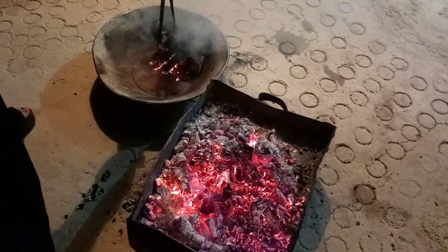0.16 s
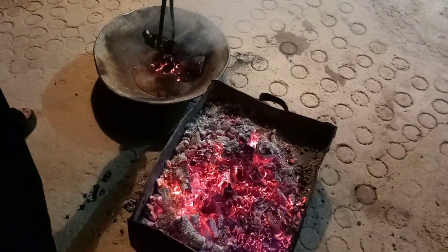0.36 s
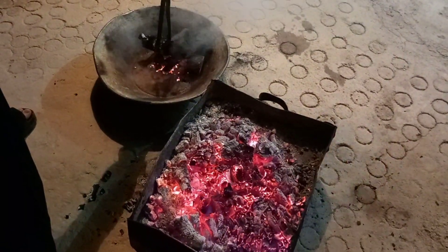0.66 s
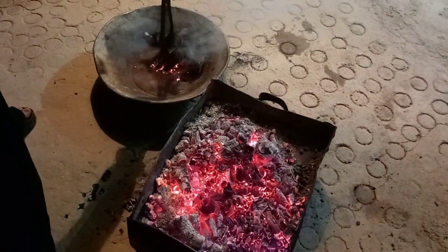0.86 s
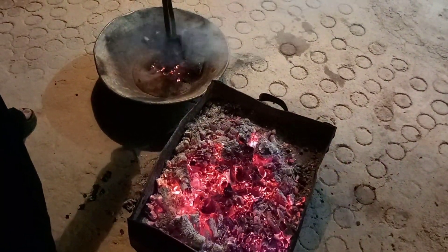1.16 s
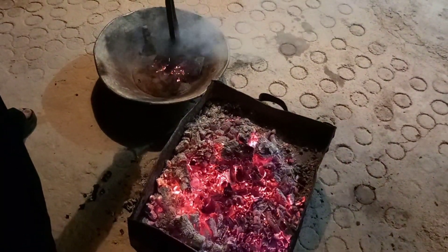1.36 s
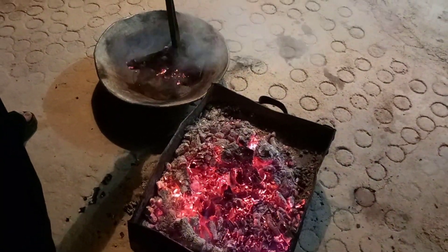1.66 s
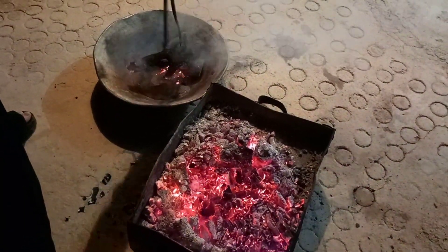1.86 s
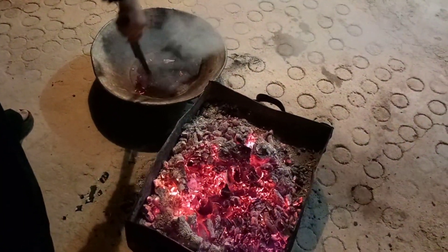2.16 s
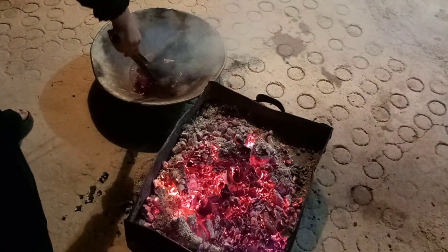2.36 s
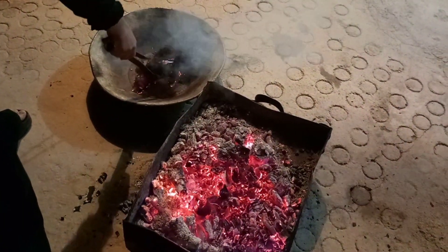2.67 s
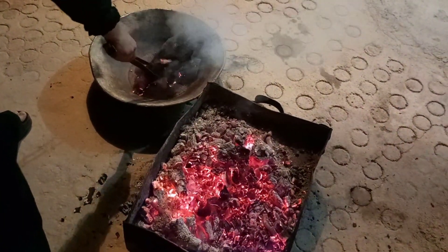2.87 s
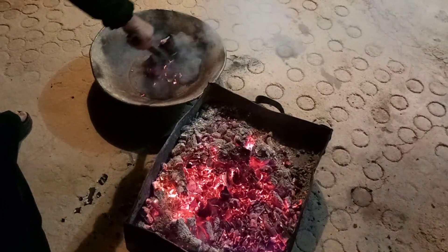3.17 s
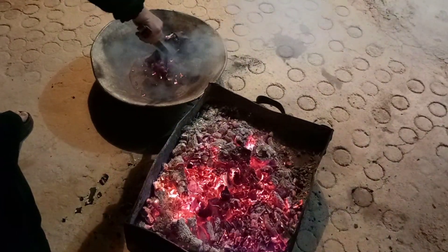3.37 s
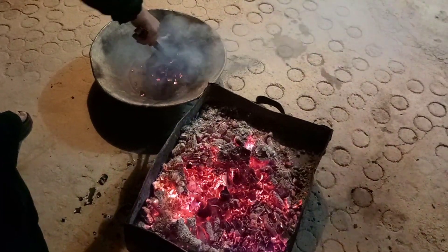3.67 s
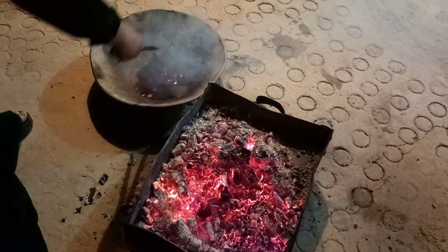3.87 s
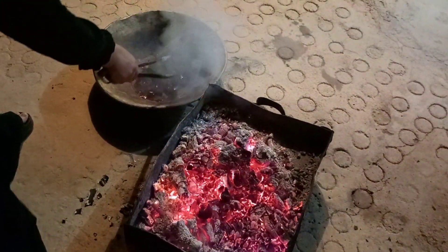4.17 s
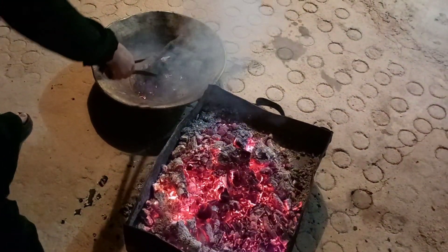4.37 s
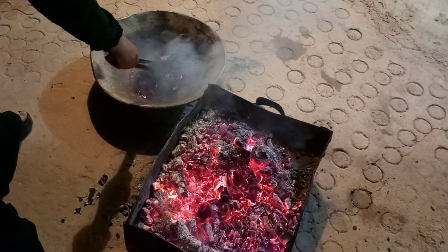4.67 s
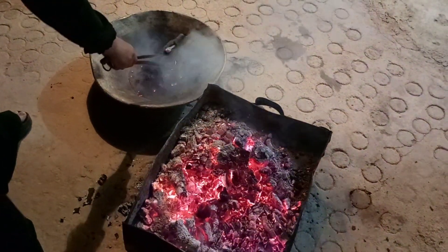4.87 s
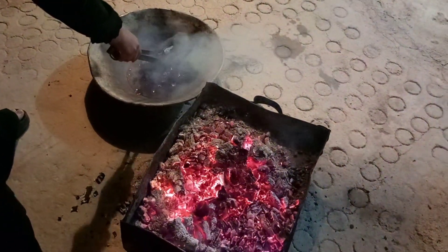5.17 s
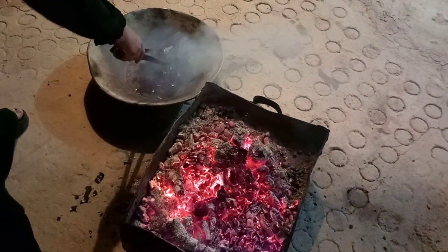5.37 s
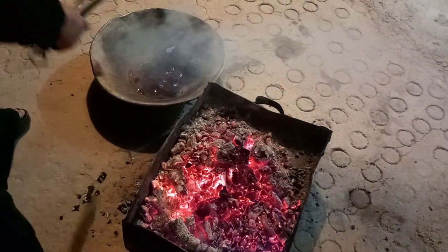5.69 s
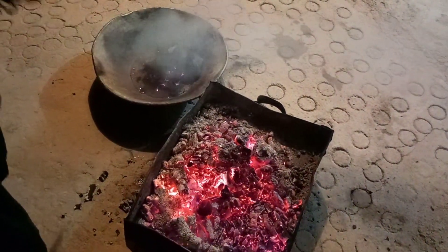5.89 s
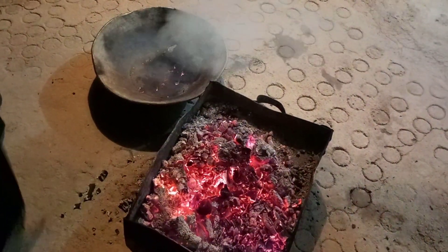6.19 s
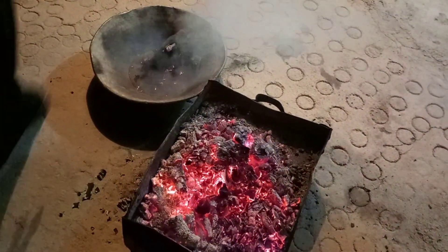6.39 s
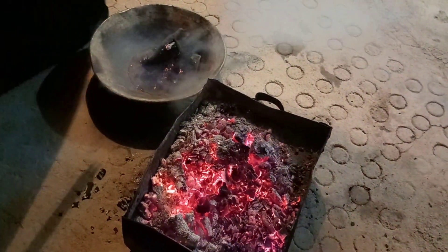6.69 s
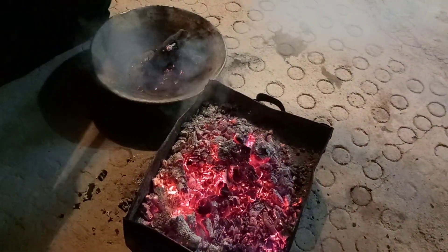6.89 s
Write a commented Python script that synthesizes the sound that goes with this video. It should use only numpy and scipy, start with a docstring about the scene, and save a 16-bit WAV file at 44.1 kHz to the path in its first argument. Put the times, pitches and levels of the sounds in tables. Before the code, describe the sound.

A close, fairly dry stereo pickup outdoors on a concrete yard, with very faint background air. From 0 to 1 s, hot charcoal sizzles finely and snaps in high dry ticks while tongs nudge it softly. From about 1.16 s the pushes become firmer: gritty scrapes, hollow low thuds and brittle cracks in a resonant metal wok, with strong crunches near 2.1 and 2.55 s and short bowl hums. Lighter stirring follows, then the loudest cluster of knocks and grinding at 3.84-4.0 s. It quiets to sparse tong ticks until further thuds at 4.8-5.13 s. After 5.3 s shoes tread softly; tongs clack brightly around 5.73-5.86 s and jingle at 6.07-6.4 s, with a tiny, piercing squeak at 6.33 s. Shoe knocks and a sandy scuff come around 6.5-6.6 s, then faint steps and ember snaps until 7 s.

```python
"""Coals grind, crackle and snap as steel tongs push smouldering charcoal about in a wok on a concrete yard.
Noise of micro-contacts, shaped by each push, excites the modes of the bowl; lumps thud, crack and leave it humming.
Touching tongs clink through their own modes; splitting embers give brief high tones with noise.
Near the end shoes tread, knock and scuff, while the tongs jingle and squeak in two wavering tones.
A weak diffuse reverberation and faint outdoor noise surround the scene."""
import sys
import numpy as np
from scipy import signal
from scipy.fft import rfft, irfft
from scipy.io import wavfile
from scipy.ndimage import uniform_filter1d

SR = 44100
rng = np.random.default_rng(int(sys.argv[2]) if len(sys.argv) > 2 else 0)


def store_wav(level_fs):
    """Save 16-bit WAV to argv[1]."""
    pcm = np.round(np.clip(np.atleast_2d(level_fs), -1, 1) * 32767)
    wavfile.write(sys.argv[1], SR, pcm.T.astype(np.int16))


N = 310464
TIME = np.arange(N) / SR   # t/s

# Event levels are relative: they apply before the sources are mixed. Decay times are to 1/e.
# Spectra: columns f/Hz, relative density level/dB.

# outdoor background
AIR_SPECTRUM = [(25, -31.5), (50, -11.5), (100, 2.5), (160, -7.5), (250, -15), (450, -15), (750, -15.5),
                (1100, -18.5), (2000, -31.5), (4000, -28), (8000, -28.5), (9500, -43), (16000, -37)]
AIR_DB = -66.5
# hot coals: level over time, columns t/s, level/dB; then spectrum
SIZZLE_LEVEL = [(0, -63.5), (.9, -61), (1.3, -70), (2.3, -78), (2.8, -61), (3.3, -63), (3.6, -72),
                (4.4, -85), (7.04, -88)]
SIZZLE_SPECTRUM = [(2000, -23), (4000, -6.5), (5500, 2.5), (8000, -0.5), (11000, -7.5), (16000, -4)]

# pushes into the coals: columns start t/s, rise t/s, hold t/s, rumble level/dB, scrape level/dB, grit level/dB
COAL_PUSHES = [ (0.0, 0.0029, .05, -59.5, -65, -61.5), (0.066, 0.0072, 0.011, -57, -53.5, -54),
               (0.216, .012, .08, -53.5, -57, -55.5), (0.305, .03, 0.2, -51, -48.5, -50),
               (0.45, 0.031, 0.053, -43, -42.5, -42), (0.555, 0.011, 0.17, -47, -49, -48.5),
               (0.709, 0.015, 0.099, -46.5, -48.5, -49), (0.891, 0.0054, 0.059, -58, -55, -53.5),
               (1.163, .002, 0.056, -35.5, -40, -41), (1.274, 0.0062, .015, -49, -41, -45),
               (1.416, .003, 0.029, -42, -37, -41), (1.526, 0.0058, 0.047, -41.5, -48, -45.5),
               (1.564, 0.024, 0.014, -41.5, -35, -36.5), (1.676, 0.01, 0.03, -38.5, -48.5, -60),
               (1.771, 0.016, 0.068, -52, -63.5, -61), (1.87, 0.018, 0.097, -55, -56, -54),
               (1.98, 0.087, 0.028, -52.5, -46, -48), (2.091, 0.0061, 0.027, -32, -27.5, -28),
               (2.343, 0.0045, 0.045, -39.5, -44.5, -43), (2.376, 0.014, 0.034, -50, -38.5, -40.5),
               (2.497, .025, .02, -44.5, -44, -46), (2.541, 0.0066, 0.013, -32, -35.5, -42),
               (2.604, 0.0062, 0.024, -43, -60, -50.5), (2.69, 0.022, .07, -53.5, -60, -55.5),
               (2.834, 0.019, 0.053, -51.5, -56, -54), (2.954, 0.0074, 0.042, -40.5, -48.5, -53),
               (3.06, 0.065, 0.079, -51.5, -55.5, -59.5), (3.221, 0.026, 0.11, -64, -55, -57.5),
               (3.363, 0.014, 0.011, -46, -47, -47), (3.411, .008, 0.032, -55, -48.5, -50.5),
               (3.665, 0.013, 0.032, -42, -56, -57.5), (3.7, .008, .1, -52.5, -48, -49.5),
               (3.843, 0.0028, 0.015, -31.5, -24.5, -26), (3.89, 0.0021, 0.053, -28.5, -25.5, -28),
               (3.976, 0.0048, 0.06, -32, -35, -38), (4.219, 0.0071, 0.037, -56, -58, -54),
               (4.58, .005, 0.12, -63.5, -65.5, -65), (4.697, 0.034, 0.063, -52, -63, -63.5),
               (4.787, 0.029, 0.065, -40, -50.5, -54), (4.897, 0.015, 0.17, -50, -54, -50),
               (5.019, 0.0089, 0.02, -33, -41, -42), (5.133, 0.014, 0.026, -44, -54.5, -54)]
PUSH_SAG_DB_PER_S = 33.5   # the heap gives way while the push lasts
SETTLE_DB_PER_S = (177.5, 178, 198)   # then the coals settle: (rumble, scrape, grit)
# lumps knocking on the bowl: columns t/s, thud level/dB, thud f/Hz, crack level/dB, decay t/s
LUMP_KNOCKS = [(0.721, -32.5, 230, -38, 0.017), (1.166, -31.5, 340, -35, 0.019),
               (1.209, -21.5, 239, -51, 0.0028), (1.842, -39, 424, -41.5, 0.0094),
               (2.104, -24.5, 243, -20, 0.024), (2.139, -28, 343, -42.5, 0.017),
               (2.543, -27.5, 280, -29, 0.03), (2.966, -37, 181, -60, 0.031), (3.313, -42, 297, -48, 0.03),
               (3.699, -38, 153, -41, 0.019), (3.848, -22, 397, -18.5, 0.0079),
               (3.892, -15.5, 267, -19, 0.0081), (3.910, -19, 800, -28, .005),
               (3.930, -16, 263, -23.5, 0.0075), (3.99, -23, 334, -49, 0.0067),
               (4.029, -30, 138, -55, 0.015), (4.14, -38.5, 290, -45, 0.012),
               (4.818, -32.5, 131, -43.5, 0.034), (5.029, -23, 354, -42, 0.0094),
               (5.126, -49, 634, -41, 0.0037)]
# modes of the bowl: columns f/Hz, gain/dB, decay by 60 dB t/s
WOK_MODES = [(125, 11.5, 0.33), (250, -7.5, 0.18), (313.6, 4.5, 0.071), (338.4, 5, 0.43), (392, -15.5, 0.8),
             (420, -20, 1), (573.7, 17.5, 0.34), (611, 8.5, 0.33), (780, -23, 0.74), (798, 17.5, 0.54),
             (834, 14, 0.38), (875.4, 16, 0.43), (1254, 20.5, 0.19), (1299, 17, 0.25), (1366, 12, 0.32),
             (1370, 10, 0.22), (1467, 16.5, 0.087), (1840, -1, .5), (1960, 2, .5), (2560, -10, 0.21),
             (2330, 13, 0.11), (2890, -3.5, .4), (3000, -8, 0.46), (3120, 0, 0.28), (3080, -7.5, .5),
             (3250, 2.5, 0.3), (3950, -14.5, .25), (4090, -13.5, 0.2), (5060, 14, 0.083)]
# spectra of the low, middle and high parts of the grinding, and of the cracks
RUMBLE_SPECTRUM = [(30, -37), (55, -26), (90, -7.5), (140, -6), (220, 0.5), (320, 5), (480, 2), (680, -7.5),
                   (900, -9.5), (1500, -33)]
SCRAPE_SPECTRUM = [(400, -37), (650, 1.5), (820, -1.5), (980, -2.5), (1250, -2), (1550, -1), (1900, -4.5),
                   (2450, -3.5), (2900, -17.5), (4500, -32.5)]
GRIT_SPECTRUM = [(1700, -35), (2400, -4), (2900, 3.5), (4000, 0), (4900, -7), (6200, -5.5), (8000, -17.5),
                 (10000, -22), (13000, -23), (16000, -26.5)]
CRACK_SPECTRUM = [(400, -10.5), (800, 7.5), (1000, -27), (1350, 4.5), (2000, -4), (3200, -2.5), (5500, 2),
                  (9000, -6), (16000, -20)]
LEAN_HZ, LEAN_T60_S, LEAN_SHARE = 1500, 0.0013, .2   # the bowl throws its middle range to the left
# splintering coal
SPLINTER_SPECTRUM = [(3000, -23), (5500, -0.5), (8000, -1), (10500, -5), (13000, -3.5), (16000, -10)]
# level relative to the grit; release after the push; sag during the push
SPLINTERS_DB, SPLINTERS_RELEASE_DB_PER_S, SPLINTERS_SAG_DB_PER_S = -7.5, 300.5, 79.5

# charcoal splitting: columns t/s, level/dB, f/Hz
EMBER_SNAPS = [(.007, -36, 14100), (0.1678, -25, 15200), (0.282, -28, 13900), (0.3764, -16, 14400),
               (.726, -30, 13100), (.764, -32, 14800), (1.018, -43, 11100), (1.055, -44, 12000),
               (1.799, -39, 4270), (3.070, -38, 9700), (3.171, -39, 7200), (4.939, -28, 14500),
               (5.955, -42, 4560), (6.511, -35, 8400), (6.839, -39, 13300), (6.887, -30, 7140),
               (6.888, -38, 3180)]
FAINT_SNAPS_DB, FAINT_SNAPS_HZ = -58, (3000, 13000)   # lowest level and range of random ticks

# one mode of the bowl humming: columns t/s, level/dB, f/Hz, decay t/s
BOWL_HUMS = [(1.29, -45, 893, 0.054), (2.11, -31.5, 347.6, 0.061), (2.551, -28.5, 347, 0.059),
             (2.971, -37.5, 349, 0.069), (3.70, -41, 348, 0.036), (3.85, -28.5, 858, 0.064),
             (3.892, -23.5, 804, 0.05), (3.895, -31.5, 1340, 0.059), (4.82, -39.5, 347, 0.069)]
# hollow blips of falling pitch: columns t/s, peak level/dB
HOLLOW_BLIPS = [(1.705, -30.5), (1.843, -35.5), (1.943, -42), (2.465, -34.5), (5.029, -23), (5.1255, -25)]

# arms touching: columns t/s, level/dB, sliding t/s, treble level re the rest/dB, favoured f/Hz
TONG_CLINKS = [(1.876, -40.5, 0.0095, 7, 14100), (1.908, -37.5, 0.0038, 8, 8500),
               (2.696, -49, 0.04, 8.5, 7450), (2.827, -40, 0.0072, -2, 5030),
               (2.875, -47, 0.023, -22, 4920), (3.89, -37.5, 0.012, 19.5, 15300),
               (4.225, -55, 0.013, -11, 5400), (4.263, -40.5, 0.0059, 7.5, 8300),
               (4.444, -60, 0.013, -3.5, 8060), (4.584, -57.5, 0.022, 8, 5700),
               (4.641, -58, 0.011, 7, 6400), (4.687, -47, 0.018, -2, 3330),
               (4.718, -53.5, 0.0046, 12, 7300), (4.999, -34.5, 0.013, 7.5, 8800),
               (5.462, -52, 0.0067, -22, 5530), (5.532, -63.5, 0.056, -22, 7300),
               (5.620, -51.5, 0.18, -9, 6270), (5.66, -42, 0.057, 16.5, 8500),
               (5.716, -46, 0.058, -4, 7500), (5.731, -40, 0.014, 22, 5600), (5.761, -33, 0.0037, -4, 6960),
               (5.785, -25.5, 0.0032, 12, 4620), (5.841, -20, 0.001, 0, 8150),
               (5.858, -35, 0.0031, -5, 7900), (5.915, -44.5, 0.0062, 6.5, 7750),
               (6.066, -45.5, 0.021, 4.5, 3080), (6.141, -49, 0.0091, -2, 7270),
               (6.228, -35.5, 0.017, 3.5, 6700), (6.33, -45, 0.036, 16, 7200), (6.34, -35, 0.028, 10, 6700),
               (6.35, -47, 0.054, -10, 3720), (6.395, -36, 0.011, 5, 6230), (6.406, -34, 0.0043, 1, 6290)]
# modes of the tongs: columns f/Hz, gain/dB, decay by 60 dB t/s
TONG_MODES = [(3014, 9, 0.16), (3710, 8, 0.086), (4040, 0.5, 0.19), (4500, 6, 0.14), (5400, 10.5, 0.062),
              (5610, -1, 0.17), (6304, 8, 0.033), (6600, -3.5, .12), (6970, 3, 0.047), (7300, -24, 0.16),
              (7660, 2.5, 0.14), (8270, 5, 0.056), (8130, -12, 0.073), (9240, 9.5, 0.047),
              (8980, -4.5, 0.034), (10100, 6, 0.11), (11130, 1.5, 0.16), (11420, 3, 0.064),
              (12100, 8.5, 0.14), (12750, 7, .08), (14070, 12.5, 0.13), (14800, -1, .06),
              (15370, -10, 0.092)]
# steel touching steel
TICK_SPECTRUM = [(700, -25), (2000, -6.5), (3500, -7), (5500, 1), (8100, 3), (9700, -7.5), (12000, -7.5),
                 (15500, -13)]
# taps that leave one arm singing: columns t/s, level/dB, f/Hz, decay t/s
TONG_PINGS = [(5.732, -40, 5200, 0.022), (5.786, -46, 4505, 0.062), (6.069, -39.5, 3025, 0.0073),
              (6.230, -48, 6815, 0.013), (2.877, -50, 4900, .02)]

# feet on concrete: columns start t/s, rise t/s, hold t/s, tread level/dB, shuffle level/dB
FOOT_TREADS = [(5.3, .03, 0.21, -62, -72.5), (5.525, 0.035, .14, -48, -60.5), (5.72, .02, 0.16, -61, -59),
               (5.88, 0.0037, 0.1, -55, -61), (6.03, 0.025, 0.061, -56, -68),
               (6.14, 0.022, 0.48, -54.5, -59.5), (6.508, .004, 0.09, -43.5, -58.5),
               (6.6, 0.031, 0.023, -54, -50.5), (6.73, .01, 0.034, -51.5, -61.5),
               (6.884, .004, 0.011, -64, -54), (6.97, .02, .06, -64, -80)]
TREAD_SAG_DB_PER_S, TREAD_RELEASE_DB_PER_S = 13, (143, 151)   # release: (tread, shuffle)
# sand under a dragging sole: columns start t/s, rise t/s, hold t/s, level/dB
SAND_SCUFFS = [(6.51, 0.0021, 0.0042, -56.5), (6.56, 0.06, 0.014, -48), (6.884, 0.0019, 0.0034, -60)]
SCUFF_RELEASE_DB_PER_S = 234
# spectra of tread, shuffle and sand
TREAD_SPECTRUM = [(25, -22), (45, -16), (70, -3), (135, 0), (210, -6), (400, -25.5), (900, -52)]
SHUFFLE_SPECTRUM = [(120, -15.5), (240, -14.5), (450, -16.5), (800, -14.5), (1200, -20.5), (2500, -24.5),
                    (6000, -38.5)]
SAND_SPECTRUM = [(600, -31), (1200, -2.5), (2400, 4.5), (4000, 3), (6000, -1), (8000, 4.5), (10000, -7),
                 (16000, -9)]
# heel and toe knocks: columns t/s, level/dB, decay t/s; then spectrum
HEEL_KNOCKS = [(5.882, -45.5, 0.029), (6.512, -49, 0.012), (6.562, -44.5, 0.037)]
HEEL_SPECTRUM = [(100, -19), (300, 2), (480, 7.0), (800, -6), (1300, -28), (4000, -20)]

# binding arms: columns start t/s, rise t/s, hold t/s, lower tone level/dB, upper tone level/dB
ARM_SQUEAKS = [(6.328, 0.016, .012, -28.5, -29.5)]
SQUEAK_HZ, SQUEAK_RELEASE_DB_PER_S = (14231, 15367), (356, 496)   # (lower tone, upper tone)

MIC_LOW_CUT_HZ, CUTOFF_HZ = 35, 15900


def from_db(db):
    """Level to amplitude: 20 dB for each factor of ten."""
    return 10 ** (np.asarray(db) / 20)


def rms_one(x):
    """Normalisation to unit rms."""
    return x / np.sqrt(np.mean(x ** 2) + 1e-20)


def even(x, size=1300):
    """Short-time normalisation: unit rms over a window of this many samples (some 30 ms by default)."""
    return x / np.sqrt(np.abs(uniform_filter1d(x ** 2, size=size)) + 1e-12)


def convolve(x, response):
    """Linear superposition: causal convolution of mono or stereo sound with a response."""
    return signal.oaconvolve(np.atleast_2d(x), np.atleast_2d(response), axes=-1)[:, :N]


def colour(x, spectrum, size=4096):
    """Minimum-phase filtering by a folded cepstrum; white noise keeps its power."""
    hz, db = np.transpose(spectrum)
    log_hz = np.log(np.fft.rfftfreq(size, 1 / SR) + 1)
    gain = rms_one(from_db(np.interp(log_hz, np.log(hz), db)))
    cepstrum = irfft(np.log(gain))[:size // 2]
    cepstrum[1:] *= 2
    return convolve(x, irfft(np.exp(rfft(cepstrum, size))))[0]


def grains(per_s, spread_db):
    """Granular contact as random impulses of uneven size and sign, evened to unit rms."""
    sizes = from_db(spread_db * np.minimum(rng.exponential(1, N), 4))
    impulses = sizes * rng.choice([-1, 1], N)
    return even(impulses * (rng.random(N) < per_s / SR))


def bursts(times, levels_db, lengths):
    """Impulsive contact: sudden onsets with exponential decay."""
    out = np.zeros(N)
    for s, db, length in zip(times, levels_db, lengths):
        part = out[int(s * SR):][:SR // 2]
        part += from_db(db) * np.exp(-TIME[:len(part)] / length)
    return out


def gestures(rows, release_db_per_s, sag_db_per_s=0):
    """Superposed powers: per level column, each gesture rises, sags while held, then decays exponentially."""
    power = np.zeros((len(release_db_per_s), N))
    for start, rise, hold, *levels_db in rows:
        first = int(start * SR)
        t = TIME[:min(SR, N - first)]
        attack = np.minimum(t / rise, 1)
        held, released = np.clip(t - rise, 0, hold), np.maximum(t - rise - hold, 0)
        for layer, db, release in zip(power, levels_db, release_db_per_s):
            gain = attack * from_db(db - sag_db_per_s * held - release * released)
            layer[first:][:len(t)] += gain ** 2
    return np.sqrt(power)


def drift(per_s):
    """Smooth random fluctuation of unit spread: power-preserving interpolation of random knots."""
    knots = rng.standard_normal(1000)
    position = TIME * min(per_s, 100)
    index = position.astype(int)
    turn = (position - index) * np.pi / 2
    return knots[index] * np.cos(turn) + knots[index + 1] * np.sin(turn)


def resonate(force, hz, t60):
    """A damped single resonance with unit gain at its peak."""
    r, w = from_db(-60 / (t60 * SR)), 2 * np.pi * hz / SR
    edge = (1 - r * r) / 2
    return signal.lfilter([edge, 0, -edge], [1, -2 * r * np.cos(w), r * r], force + 1e-18)


def ring(force, modes, roam_db):
    """Modal superposition: as the point of contact roams, the drive of each mode drifts at random."""
    out = 0
    for hz, db, t60 in modes:
        drive = force * from_db(roam_db * drift(per_s=9))
        out = out + from_db(db) * resonate(drive, hz, t60)
    return out


def sung(taps, swell_s):
    """Free vibration of single modes: a quick swell and an exponential decay."""
    out, t = np.zeros(N), TIME[:SR // 2]
    for s, db, hz, dying in taps:
        start = int(s * SR)
        envelope = np.exp(-t / dying) * (1 - np.exp(-t / swell_s))
        tone = np.sin(2 * np.pi * hz * (t + start / SR))
        part = out[start:][:len(t)]
        part += (from_db(db) * tone * envelope)[:len(part)]
    return out


def diffuse(x, t60, dull_hz, alike_hz):
    """A diffuse decaying tail of unit energy: treble dies sooner, both sides share the bass."""
    t = TIME[:int(min(1.5 * t60, 1) * SR)]
    mid, side = rng.standard_normal((2, SR))[:, :len(t)]
    side = signal.sosfilt(signal.butter(2, alike_hz, "high", fs=SR, output="sos"), side)
    noise = mid + side * [[1], [-1]]
    low = signal.sosfilt(signal.butter(1, min(dull_hz, SR / 3), fs=SR, output="sos"), noise)
    decay = from_db(-60 * t / t60)
    tail = low * decay + (noise - low) * decay ** 2
    return convolve(x, tail / np.sqrt(np.sum(tail ** 2) / 2))


def hollow(x, t60, count=3):
    """Early reflections: several short diffuse tails whose balance drifts at constant total power."""
    weights = np.array([drift(per_s=7) for _ in range(count)])
    weights /= np.sqrt(np.sum(weights ** 2, axis=0))
    return sum(diffuse(x * weight, t60, dull_hz=9700, alike_hz=600) for weight in weights)


def place(x, lag_ms, pan_db):
    """Interchannel time and level differences: the right lags; positive pan favours the left."""
    late = np.concatenate([np.zeros(round(lag_ms * SR / 1000)), x])[:N]
    return np.array([x, late]) * from_db([[pan_db / 2], [-pan_db / 2]])


def air():
    """Partly coherent background: faint outdoor noise whose bass is shared by both sides."""
    mid, side = (colour(noise, AIR_SPECTRUM) for noise in rng.standard_normal((2, N)))
    side = signal.sosfilt(signal.butter(1, 500, "high", fs=SR, output="sos"), side)
    return from_db(AIR_DB) * (mid + side * [[1], [-1]])


def sizzle():
    """Random micro-impulses: hot coals crackle finely, independently on each side, at a changing level."""
    crackle = np.array([colour(grains(per_s=2500, spread_db=5.5), SIZZLE_SPECTRUM) for _ in range(2)])
    return from_db(np.interp(TIME, *np.transpose(SIZZLE_LEVEL))) * crackle


def thuds(cycles=8.8):
    """Heavily damped resonance: a lump pushes on the bowl and booms at its own pitch."""
    out, t = np.zeros(N), TIME[:SR // 4]
    for s, db, hz, _, dying in LUMP_KNOCKS:
        # narrow-band noise, taken once the resonance is established
        boom = even(resonate(rng.standard_normal(SR // 2), hz, cycles / hz), size=500)[-len(t):]
        out[int(s * SR):][:len(t)] += from_db(db) * boom * np.exp(-t / dying)
    return signal.sosfilt(signal.butter(3, [85, 900], "band", fs=SR, output="sos"), out)


def wok():
    """Forced vibration: coals grind and knock on a bowl of a few strong modes and a diffuse wash."""
    rumble, scrape, grit = gestures(COAL_PUSHES, SETTLE_DB_PER_S, PUSH_SAG_DB_PER_S)
    s, _, _, crack_db, dying = np.transpose(LUMP_KNOCKS)
    catch = even(from_db(3.1 * drift(per_s=71)))   # lumps catch and give way
    low = rumble * even(colour(grains(per_s=2500, spread_db=3.0), RUMBLE_SPECTRUM)) + thuds()
    middle = colour(catch * scrape * grains(per_s=3500, spread_db=4.0), SCRAPE_SPECTRUM)
    top = colour(catch * grit * grains(per_s=6000, spread_db=3.5), GRIT_SPECTRUM)
    cracks = colour(bursts(s, crack_db, dying) * grains(per_s=5500, spread_db=1.0), CRACK_SPECTRUM)

    bright = from_db(-5.0) * middle + from_db(-3.5) * top + from_db(-8.5) * cracks
    force = from_db(-1.0) * low + bright

    direct = from_db(-4.5) * place(low, lag_ms=.11, pan_db=1.0)
    direct += from_db(-4.5) * place(middle, lag_ms=.2, pan_db=4.5)
    direct += place(from_db(-6.0) * top + from_db(-15.5) * cracks, lag_ms=.12, pan_db=-10.5)
    modes = place(from_db(-8.0) * ring(force, WOK_MODES, roam_db=4.0), lag_ms=.2, pan_db=1.5)
    reflections = from_db(1.5) * hollow(bright, t60=0.042, count=5)
    wash = from_db(-6.5) * diffuse(force, t60=0.29, dull_hz=5000, alike_hz=600)
    bowl = direct + modes + reflections + wash
    return bowl + LEAN_SHARE * resonate(bowl, LEAN_HZ, LEAN_T60_S) * [[1], [-1]]


def splinters():
    """Brittle fracture: coal splinters most at the start of a push and fades fast as the pressure eases."""
    grit_rows = [(*push[:3], push[-1]) for push in COAL_PUSHES]
    gain, = gestures(grit_rows, [SPLINTERS_RELEASE_DB_PER_S], SPLINTERS_SAG_DB_PER_S)
    spray = from_db(SPLINTERS_DB) * colour(gain * grains(per_s=4400, spread_db=6.5), SPLINTER_SPECTRUM)
    direct = from_db(-2.5) * place(spray, lag_ms=.12, pan_db=-7.5)
    return direct + from_db(-1) * diffuse(spray, t60=0.055, dull_hz=12000, alike_hz=600)


def snaps(cycles=8, splinter_db=-19, splinter_s=0.0022, count=18):
    """Impulsive fracture: a tone damped within a few cycles and a tiny noise spray; faint ones come at random."""
    out, t = np.zeros((2, N)), TIME[:SR // 50]
    faint = []
    for when, size, pitch in rng.random((count, 3)):
        hz = np.interp(pitch, [0, 1], FAINT_SNAPS_HZ)
        faint.append((when * TIME[-1], FAINT_SNAPS_DB + 6 * size, hz))
    for s, db, hz in EMBER_SNAPS + faint:
        tone = np.sin(2 * np.pi * hz * t) * np.exp(-np.pi * hz * t / cycles)
        spray = from_db(splinter_db) * rng.standard_normal((2, len(t))) * np.exp(-t / splinter_s)
        part = out[:, int(s * SR):][:, :len(t)]
        part += from_db(db) * (tone + spray)[:, :part.shape[1]]
    return out


def hum():
    """Free vibration: one mode of the bowl sings on after a firm push."""
    return place(sung(BOWL_HUMS, swell_s=.003), lag_ms=.11, pan_db=1.5)


def blips(start_hz=800, end_hz=170, fall_s=0.00386, swell_s=.003):
    """Frequency glide: a few cycles whose high part arrives first and low part follows."""
    out, t = np.zeros(N), TIME[:SR // 20]
    hz = end_hz + (start_hz - end_hz) * np.exp(-t / fall_s)
    envelope = t / swell_s * np.exp(1 - t / swell_s)
    blip = np.sin(2 * np.pi * np.cumsum(hz) / SR) * envelope
    for s, db in HOLLOW_BLIPS:
        out[int(s * SR):][:len(t)] += from_db(db) * blip
    return place(out, lag_ms=.11, pan_db=1.0)


def tongs(bright_hz=9500, main_s=0.0021, free_s=0.0065):
    """Sliding contact: steel on steel sprays tiny impacts into the modes; each touch favours one pitch."""
    s, level_db, sliding, bright_db, _ = np.transpose(TONG_CLINKS)
    contacts = grains(per_s=12000, spread_db=-3.0)
    low_pass = signal.butter(3, bright_hz, fs=SR, output="sos")
    high_pass = signal.butter(3, bright_hz, "high", fs=SR, output="sos")
    soft = signal.sosfilt(low_pass, contacts * bursts(s, level_db, sliding))
    hard = signal.sosfilt(high_pass, contacts * bursts(s, level_db + bright_db, sliding))
    force = colour(soft + hard, TICK_SPECTRUM)

    # a short clack shuts the arms and damps them; a sliding touch leaves them free to ring
    latest = np.maximum(np.searchsorted(s, TIME) - 1, 0)
    free = np.sqrt(np.minimum(sliding / free_s, 1))[latest]
    steel = from_db(-9.0) * force + from_db(-2.0) * ring(force * free, TONG_MODES, roam_db=2)

    t = TIME[:SR // 4]
    for start, db, length, _, hz in TONG_CLINKS:
        tone = even(resonate(rng.standard_normal(SR // 2), hz, t60=0.018), size=200)[-len(t):]
        steel[int(start * SR):][:len(t)] += from_db(db - 6.5) * tone * np.exp(-t / (length + main_s))
    direct = place(steel, lag_ms=.272, pan_db=0)
    return direct + from_db(1.0) * hollow(steel * free, t60=0.01)


def pings():
    """Free vibration: one arm of the tongs sings on after a tap."""
    return place(sung(TONG_PINGS, swell_s=.0005), lag_ms=.272, pan_db=0)


def feet():
    """Granular friction: soft treads, a shuffle and sand grinding under a sole."""
    tread, shuffle = gestures(FOOT_TREADS, TREAD_RELEASE_DB_PER_S, TREAD_SAG_DB_PER_S)
    sand, = gestures(SAND_SCUFFS, [SCUFF_RELEASE_DB_PER_S])
    soles = from_db(-2.5) * colour(tread * grains(per_s=8400, spread_db=1.0), TREAD_SPECTRUM)
    soles += from_db(-1.4) * colour(shuffle * grains(per_s=3600, spread_db=4.0), SHUFFLE_SPECTRUM)
    gritty = colour(sand * grains(per_s=6300, spread_db=6.5), SAND_SPECTRUM)
    direct = place(soles, lag_ms=0.29, pan_db=3.0) + from_db(-6) * place(gritty, lag_ms=0.19, pan_db=-3)
    return direct + from_db(1) * hollow(gritty, t60=0.029)


def heels():
    """Damped impact: short dull knocks of a shoe on concrete."""
    knocks = bursts(*np.transpose(HEEL_KNOCKS)) * grains(per_s=7100, spread_db=-1.0)
    return place(colour(knocks, HEEL_SPECTRUM), lag_ms=0.25, pan_db=0)


def squeak(waver_hz=25):
    """Friction-driven vibration: two high modes of the tongs sing, slightly unsteady in pitch."""
    out = 0
    for hz, gain in zip(SQUEAK_HZ, gestures(ARM_SQUEAKS, SQUEAK_RELEASE_DB_PER_S)):
        waver = waver_hz * rms_one(uniform_filter1d(rng.standard_normal(N), size=200))
        phase = 2 * np.pi * np.cumsum(hz + waver) / SR
        out = out + np.sqrt(2) * gain * np.sin(phase)   # the gain is an rms value
    return place(out, lag_ms=.272, pan_db=0)


def scene():
    """Superposition of all sources, with a weak reverberation from the walls of the yard."""
    coals = wok() + splinters() + snaps() + hum() + blips()
    near = coals + tongs() + pings() + feet() + heels() + squeak()
    yard = from_db(-18.0) * diffuse(near[0], t60=0.4, dull_hz=5000, alike_hz=400)   # fed by the left side
    return near + yard + sizzle() + air()


def record(dry):
    """Band limitation: the microphone loses the deepest bass; the top is cut steeply."""
    thinned = signal.sosfilt(signal.butter(2, MIC_LOW_CUT_HZ, "high", fs=SR, output="sos"), dry)
    return signal.sosfilt(signal.ellip(10, .1, 80, CUTOFF_HZ, fs=SR, output="sos"), thinned)


dry = scene()
out = record(dry)
store_wav(out)
```